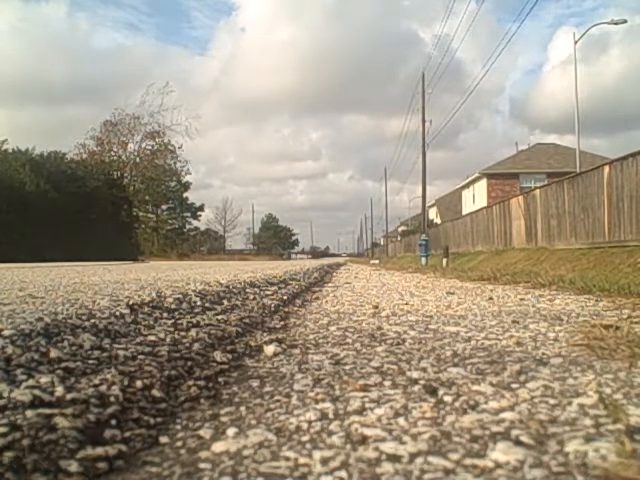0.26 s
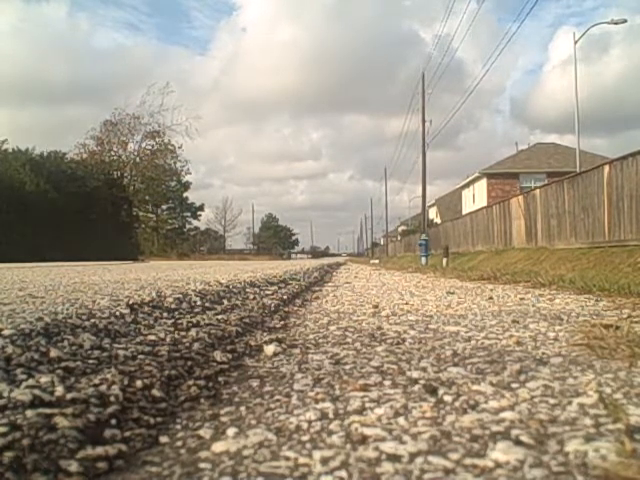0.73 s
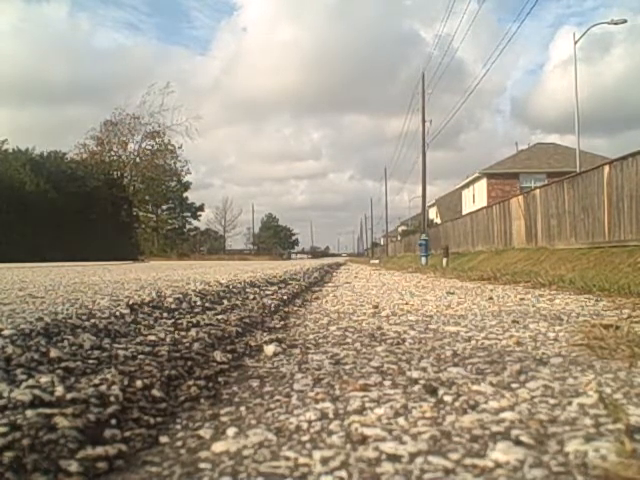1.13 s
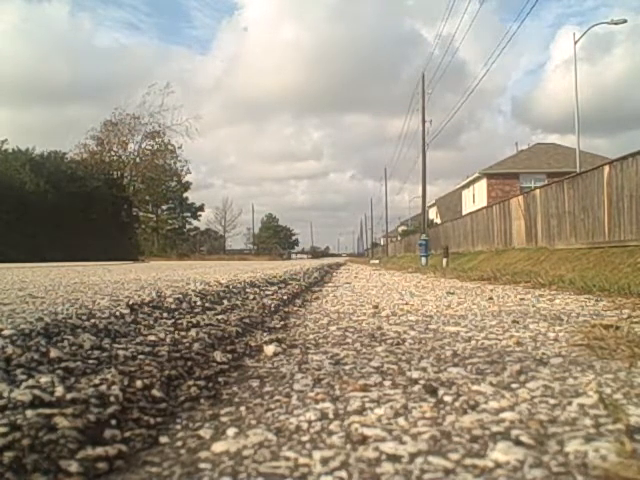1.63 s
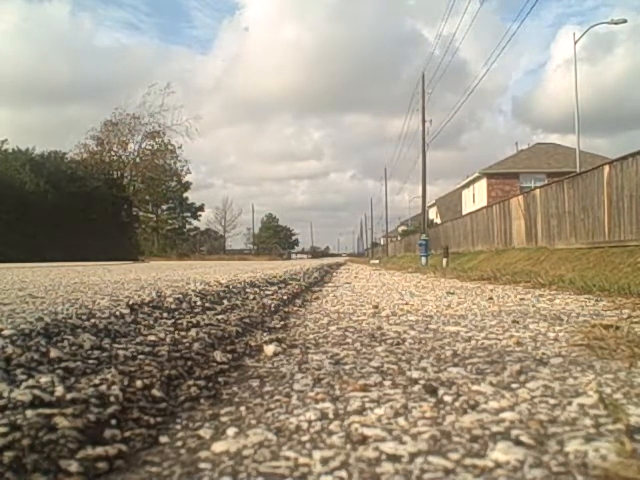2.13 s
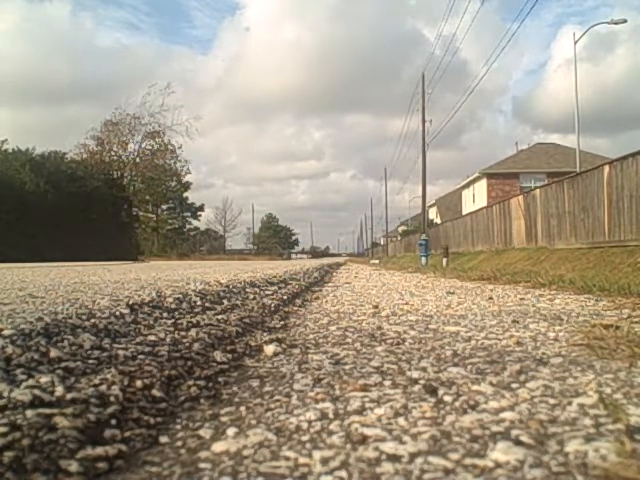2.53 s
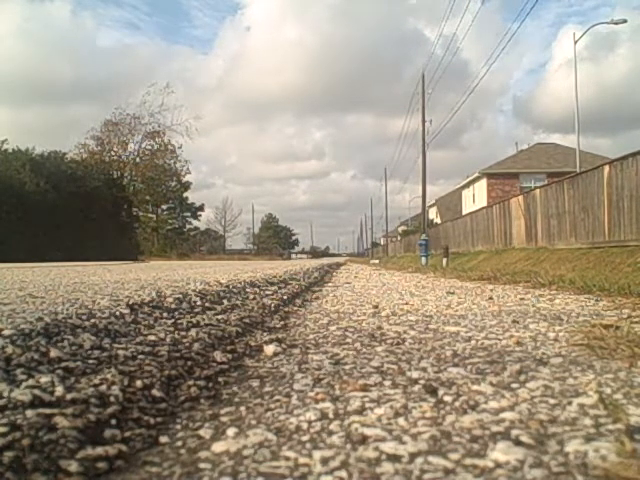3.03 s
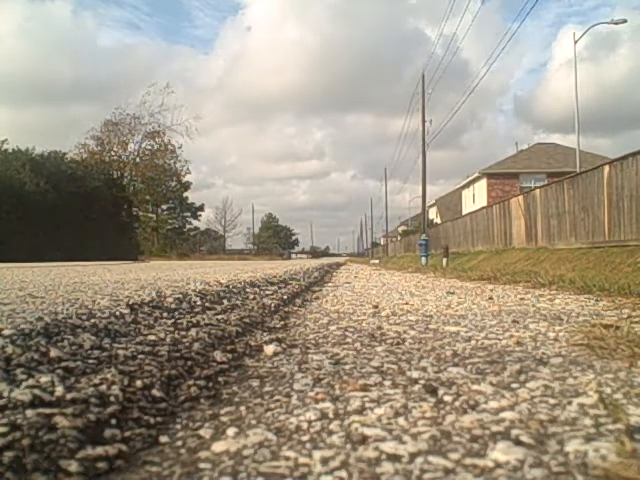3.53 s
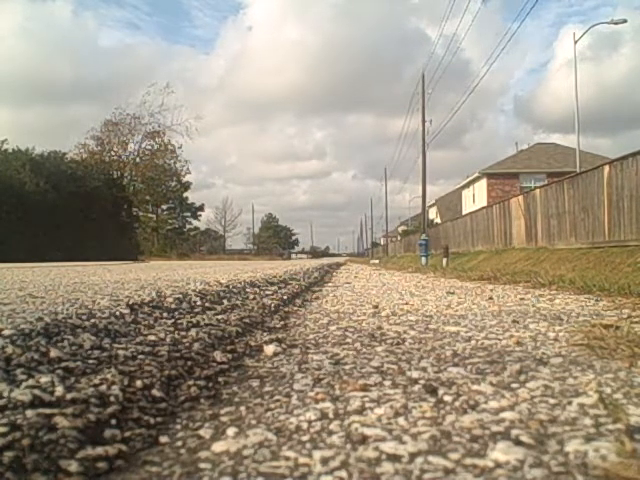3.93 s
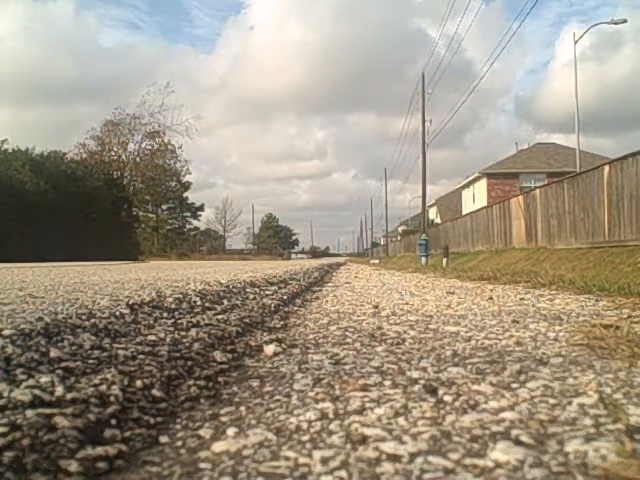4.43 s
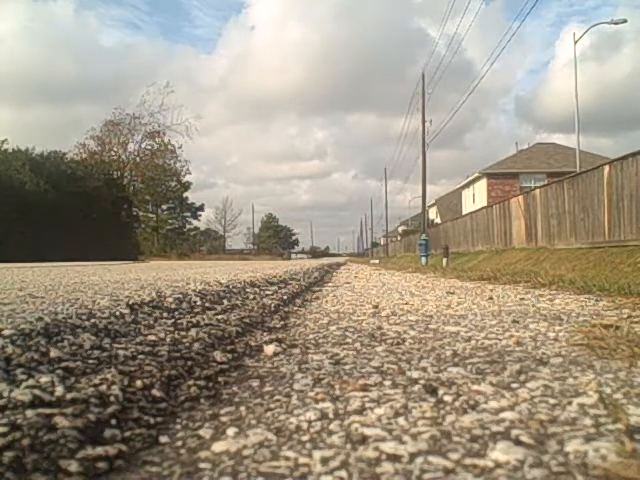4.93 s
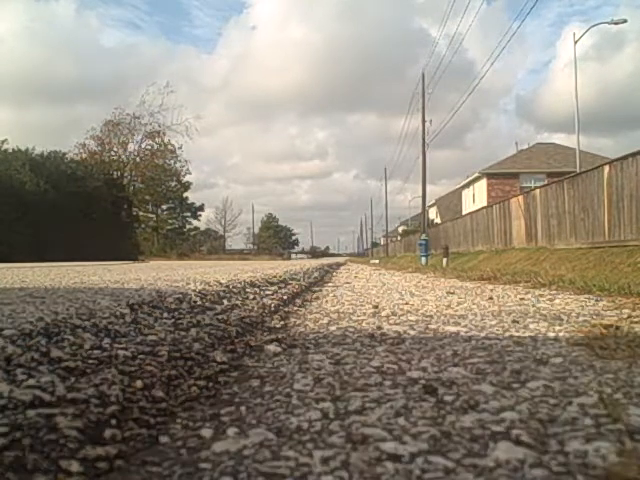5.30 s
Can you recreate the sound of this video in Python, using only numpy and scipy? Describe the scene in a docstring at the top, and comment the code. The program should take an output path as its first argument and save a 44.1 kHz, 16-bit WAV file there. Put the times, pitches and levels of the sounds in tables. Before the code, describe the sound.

A car slows along a quiet street, its boomy exhaust sinking to a burbling idle as tyres crackle up close over loose stones.

```python
"""A boomy exhaust note throbs against its own echo as a four-cylinder car slows down a quiet street.
The note sinks, lifts for a downshift and sinks again to a burbling idle, each firing ringing the silencer.
The tyres roar on the coarse road and, rolling up close, crackle over sand and loose stones.
As the car nears, its cooling fan hums and its turning parts whir.
Behind it all lies a low outdoor rumble, with faint microphone hiss and a thin high whine."""
import sys
import numpy as np
from scipy import signal
from scipy.fft import rfft, irfft, next_fast_len
from scipy.io import wavfile
from scipy.ndimage import uniform_filter1d, map_coordinates

SR = 44100
rng = np.random.default_rng(int(sys.argv[2]) if len(sys.argv) > 2 else 0)


def generate_wav(signal):
    """Clip the signal to [-1, 1] and save it as 16-bit WAV at the path in sys.argv[1]."""
    frames = np.transpose(np.atleast_2d(signal))
    scaled = np.clip(frames, -1, 1) * 32767
    pcm = np.round(scaled).astype(np.int16)
    wavfile.write(sys.argv[1], SR, pcm)


N = 245195
TIME = np.arange(N) / SR

# low outdoor rumble, faint microphone hiss and a thin high whine: (frequency [Hz], relative level [dB])
BACKGROUND_COLOUR = [(15, 7.5), (45, 10.5), (90, 10), (300, -4), (2000, -31), (5000, -50.5), (10000, -50),
                     (12500, -54), (14900, -30), (15280, -26), (15600, -36)]
# tone colours of the four tyre noises and a snapping stone: (frequency [Hz], relative level [dB])
ROAR_COLOUR = [(400, -8.5), (700, -8.5), (980, 3), (1300, 1.5), (1750, 0), (2100, -2), (2500, -9.5),
               (3200, -22), (4500, -26), (8000, -80)]
RUMBLE_COLOUR = [(15, -22), (45, 9), (90, -0.5), (160, 8), (270, 5), (360, 5), (470, 2.5), (590, -0.5),
                 (730, 3.5), (1000, -8), (2000, -43.5)]
HISS_COLOUR = [(1000, -18), (2800, 12.5), (3400, 5.5), (4300, 2.5), (5200, 2.5), (6200, -0.5), (7400, -3),
               (7900, -3), (8700, -4), (10200, -3.5), (12000, -6.5), (15500, -9)]
SAND_COLOUR = [(1000, -36), (2600, -4), (4200, 3), (5200, -2.5), (6300, 0), (7500, -0.5), (8800, -1.5),
               (9900, 0), (12000, -3), (15500, -3)]
SNAP_COLOUR = [(1500, -19), (3800, 3), (5600, 3.5), (7300, 4), (10000, 7.5), (12000, -2), (15500, -8.5)]
# how loud the tyres are: (time [s], roar level [dB], rumble level [dB], hiss level [dB])
TYRE_LEVELS = [(0, -46, -54.5, -71.5), (2.1, -45.5, -50.5, -66.5), (2.75, -42.5, -46, -59),
               (3.5, -42.5, -43.5, -59.5), (4.7, -45, -41.5, -63), (5.15, -46, -42.5, -56),
               (5.56, -44, -41, -53.5)]
# loose stones snapping under the tyres: (time [s], relative level [dB], ring pitch [Hz])
STONE_SNAPS = [(4.598, -45, 14530), (4.7277, -37, 12000), (4.832, -31.5, 9650), (4.9416, -31, 10000),
               (4.9744, -33, 6920), (5.0604, -24, 4160), (5.129, -31, 4500), (5.192, -24, 5513),
               (5.334, -24.5, 4500), (5.4117, -36, 5956), (5.5207, -24, 7640)]
# ringing of engine bay, wheels and brakes, each heard from its own angle:
# (pitch [Hz], filter width [Hz], top level [dB], loudest at [s], fade time [s])
PART_WHIRS = [(435, 79, -41, 4.9, 0.14), (700, 130, -48.5, 4.53, 0.5), (830, 280, -43, 4.95, 0.29),
              (1344, 530, -47.5, 4.676, 0.56), (1740, 98, -52.5, 3.33, 0.86), (2047, 65, -52.5, 4.42, 0.38),
              (5230, 2100, -59, 4.766, 0.64)]
# how often the engine fires, as heard: (time [s], firing rate [Hz])
FIRING_RATE = [(0, 119.5), (.39, 114.4), (1.11, 101), (1.63, 89.25), (2.01, 83.5), (2.26, 82.5),
               (2.48, 99.7), (2.59, 106.1), (2.8, 102.7), (2.91, 98.6), (3.33, 83.43), (3.84, 66.1),
               (4.33, 48.8), (4.65, 36.83), (4.96, 36.21), (5.22, 27.82), (5.56, 25.92)]
# the loudest hollow throbs of the silencer near idle: (time [s], pitch [Hz], top level [dB])
SILENCER_BOOMS = [(4.435, 182, -33.5), (4.61, 179.2, -30), (4.843, 157.8, -27), (4.964, 158.5, -33),
                  (5.028, 168, -29.5), (5.159, 163.8, -34.5), (5.236, 164.2, -30.5)]
# pitches at which the silencer rings: (pitch [Hz], base filter width [Hz], relative level [dB])
SILENCER_RINGS = [(91.3, 13.6, 3), (120.3, 19.7, 3.5), (173.4, 37, 1.5), (226.8, 20.4, -3),
                  (348.5, 59, -16), (443, 36, -19)]
# how loudly the silencer rings: (time [s], base level [dB])
BURBLE_LEVEL = [(0, -51), (2, -57.5), (2.9, -52), (3.7, -53), (4.1, -35.5), (4.9, -32.5), (5.56, -35)]
# how the pipe lifts or weakens a tone sliding through its resonances: (pitch [Hz], gain [dB])
PIPE_RESPONSE = [(25, -23), (36, -11.5), (48, -11), (58, -4), (72, 4), (86, 0.5), (100, -0.5), (112, 5.5),
                 (122, 3.5), (147, -3), (176, 5), (196, -3), (207, -8.5), (245, 0.5)]
# strength of the smooth exhaust note: (time [s], base level [dB])
NOTE_LEVEL = [(0, -39.5), (.55, -37.5), (.88, -42), (1.2, -37.5), (2.1, -35.5), (2.65, -30.5), (3.7, -29),
              (4.17, -22), (4.36, -27), (5.56, -34)]
# weaker engine tones: (pitch [times the firing rate], relative level [dB])
WEAK_TONES = [(1.5, -30), (2.5, -29), (3, -22), (4, -29), (4.5, -24)]
# the echo beats against the note, more slowly as the car slows: (time [s], beat rate [Hz])
ECHO_BEATS = [(.408, 9.06), (1.09, 5.22)]

CLUTCH_OPEN_S, CLUTCH_SHUT_S, CLUTCH_RAMP_S = 2.12, 2.605, 0.049  # the downshift


def undb(db):
    """Turn decibels into a gain to multiply by."""
    return 10 ** (np.asarray(db) / 20)


def curves(table):
    """The columns of a table, joined by straight lines in time."""
    times, *columns = np.transpose(table)
    return [np.interp(TIME, times, column) for column in columns]


def ramp(middle_s, length_s):
    """A straight rise from 0 to 1 around a moment."""
    return np.clip((TIME - middle_s) / length_s + .5, 0, 1)


def swell(peak_s, fade_s):
    """A smooth rise to 1 and fall back around a moment."""
    return np.exp(-((TIME - peak_s) / fade_s) ** 2)


def unit(x):
    """Scale a signal to a typical size (rms) of 1."""
    return x / np.std(x)


def wander(rate_hz):
    """A smooth random drift of typical size 1, with about rate_hz new values a second."""
    hold = int(SR / rate_hz)
    steps = np.repeat(rng.standard_normal(N // hold + 1), hold)
    return unit(uniform_filter1d(uniform_filter1d(steps, hold), hold)[:N])


def colour(x, points, band_hz=None):
    """Give a sound a tone colour; its typical size is 1 overall, or inside the band."""
    size = next_fast_len(N, real=True)
    bins_hz = np.maximum(np.fft.rfftfreq(size, 1 / SR), 1)
    hz, db = np.transpose(points)
    shaped = rfft(x, size) * undb(np.interp(np.log(bins_hz), np.log(hz), db))
    inside = shaped if band_hz is None else shaped[(bins_hz > band_hz[0]) & (bins_hz < band_hz[1])]
    return irfft(shaped, size)[:N] * size / np.sqrt(2 * np.sum(np.abs(inside) ** 2))


def resonate(x, hz, width_hz, passes=1):
    """Make a sound ring at one pitch; each extra pass narrows the ring."""
    for _ in range(passes):
        x = signal.lfilter(*signal.iirpeak(hz, hz / width_hz, SR), x)
    return x


def background(level_db=-52):
    """Low outdoor rumble, with faint microphone hiss and a thin high whine."""
    return undb(level_db + wander(6.1)) * colour(rng.standard_normal(N), BACKGROUND_COLOUR)


def remoteness(arrives_s=5.68, arrival_m_s=3, braking_m_s2=2.5, side_m=1.6):
    """How far off the braking car is: 0 when alongside, 1 more for each tenfold distance."""
    left_s = arrives_s - TIME
    along_m = arrival_m_s * left_s + .5 * braking_m_s2 * left_s ** 2
    return np.log10(np.hypot(along_m, side_m) / side_m)


def fan_and_whirs(far, fan_hz=47.7, alongside_db=-33.5, tenfold_loss_db=29):
    """The cooling fan hums, and each turning part whirs loudest when it faces the listener."""
    fan_turns = np.cumsum(fan_hz * (1 + 0.0076 * wander(5.3))) / SR
    out = undb(alongside_db - tenfold_loss_db * far) * np.sqrt(2) * np.sin(2 * np.pi * fan_turns)
    for hz, width_hz, db, peak_s, fade_s in PART_WHIRS:
        whir = unit(resonate(rng.standard_normal(N), hz, width_hz, passes=2))
        out += undb(db) * swell(peak_s, fade_s) * whir
    return out


def fence(direct, strength=0.17, far_lag_s=.004, near_lag_s=.016):
    """A roadside fence reflects the tyre noise; the detour grows as the car comes closer."""
    lag_s = far_lag_s * (near_lag_s / far_lag_s) ** (TIME / TIME[-1])
    reflected = map_coordinates(direct, [(TIME - lag_s) * SR], order=3)
    return (direct + strength * reflected) / np.sqrt(1 + strength ** 2)


def grit(cracks_per_s=2500, spread_db=3):
    """Countless tiny cracks of sand under the tread, a few much bigger than the rest."""
    sizes = undb(spread_db * np.minimum(rng.exponential(size=N), 4))
    cracks = rng.random(N) < cracks_per_s / SR
    return unit(cracks * sizes * rng.standard_normal(N))


def crumble(breaks_per_s=55, crush_s=0.0038):
    """Loudness of the crunch: small pebbles give way at random, each a spurt that dies away."""
    breaks = (rng.random(N) < breaks_per_s / SR) * rng.uniform(0.47, 1, N)
    gain = 1 + signal.lfilter([1], [1, -np.exp(-1 / (crush_s * SR))], breaks)
    return gain / np.sqrt(np.mean(gain ** 2))


def tyres(far, grit_share=0.1, sand_alongside_db=-43.5, tenfold_loss_db=30):
    """The tread roars and hisses, the tyre body rumbles, and sand crunches when the car is near."""
    roar_db, rumble_db, hiss_db = curves(TYRE_LEVELS)
    roar = colour(rng.standard_normal(N), ROAR_COLOUR, band_hz=(900, 2200))
    rumble = colour(rng.standard_normal(N), RUMBLE_COLOUR, band_hz=(280, 700))
    hiss = colour(rng.standard_normal(N), HISS_COLOUR, band_hz=(4500, 15000))
    contact = np.sqrt(1 - grit_share) * rng.standard_normal(N) + np.sqrt(grit_share) * grit()
    sand = colour(contact, SAND_COLOUR, band_hz=(4500, 15000))
    return (roar * undb(roar_db + 0.22 * wander(14))
            + rumble * undb(rumble_db + 0.19 * wander(9))
            + hiss * undb(hiss_db + 0.27 * wander(31.6))
            + sand * undb(sand_alongside_db - tenfold_loss_db * far) * crumble())


def stones(crush_s=0.0077, rise_s=0.0022, gain_db=-10, colour_spread_db=2, ring_db=6):
    """A pinched stone gives way in a short spray of cracks, each stone with its own colour and ring."""
    out = np.zeros(N)
    for snap_s, db, ring_hz in STONE_SNAPS:
        age_s = np.maximum(TIME - snap_s + rise_s, 0)
        burst = (1 - np.exp(-age_s / rise_s)) * np.exp(-age_s / crush_s)
        own_colour = [(hz, level + colour_spread_db * rng.standard_normal()) for hz, level in SNAP_COLOUR]
        spray = colour(rng.standard_normal(N), own_colour)
        ring = undb(ring_db) * resonate(spray, ring_hz, width_hz=0.29 * ring_hz)
        out += undb(db + gain_db) * burst * unit(spray + ring)
    return out


def stumble():
    """The engine's brief jolt as the clutch opens, from 0 to 1 and back."""
    return swell(CLUTCH_OPEN_S, fade_s=.03)


def unevenness(firing_hz, clutch_open, idle_below_hz=44, idle_onset_hz=4):
    """The engine fires unevenly when it stumbles, runs free or sinks towards idle."""
    idle = 1 / (1 + np.exp((firing_hz - idle_below_hz) / idle_onset_hz))
    return stumble() + 0.24 * clutch_open + 0.26 * idle


def booms(fade_s=.028):
    """The silencer's main ring swells and sinks in short throbs."""
    return sum(undb(db) * swell(peak_s, fade_s) * np.sqrt(2) * np.sin(2 * np.pi * hz * TIME)
               for peak_s, hz, db in SILENCER_BOOMS)


def burble(firings, firing_hz, uneven, scatter_db=6, puff_cycles=0.19, stumble_db=8):
    """Each firing kicks the silencer into ringing and sends a puff of rushing gas after it."""
    fired = np.flatnonzero(np.diff(np.floor(firings))) + 1
    kicks = np.zeros(N)
    kicks[fired] = undb(scatter_db * uneven[fired] * rng.standard_normal(len(fired)))
    kicks *= np.sqrt(firing_hz.min() / firing_hz)  # faster kicks are each softer
    puffs = 0.065 * np.exp(-(firings % 1) / puff_cycles) * rng.standard_normal(N)
    rings = sum(undb(db) * resonate(kicks + puffs, hz, 1.07 * width_hz, passes=2)
                for hz, width_hz, db in SILENCER_RINGS)
    return unit(rings) * undb(curves(BURBLE_LEVEL)[0] + stumble_db * stumble())


def pipe_db(hz):
    """How much the exhaust pipe lifts or weakens a tone at this pitch."""
    points_hz, db = np.transpose(PIPE_RESPONSE)
    return np.interp(np.log(hz), np.log(points_hz), db)


def wall_throb(angle, first_dip_s=.099):
    """A tone beats against its echo, which is lower because the car drives away from the echoing wall."""
    echo_gain = .8 * (1 - ramp(middle_s=1.46, length_s=.16))
    beats = np.cumsum(curves(ECHO_BEATS)[0]) / SR
    # the echo falls one cycle further behind on every beat
    slip = 2 * np.pi * (beats - np.interp(first_dip_s, TIME, beats) + .5)
    return (np.cos(angle) + echo_gain * np.cos(angle - slip)) / np.sqrt(1 + echo_gain ** 2)


def exhaust_note(firings, firing_hz, uneven, clutch_open, clutch_dip_db=-7.5, octave_db=-9.5):
    """The firings blend into a smooth note with higher tones, quieter while the clutch is open."""
    level_db = curves(NOTE_LEVEL)[0] + clutch_dip_db * clutch_open
    angle = 2 * np.pi * firings
    waver_db = (.5 + 2 * clutch_open) * wander(25.1)
    note = undb(level_db + pipe_db(firing_hz) + waver_db) * wall_throb(angle)
    octave = undb(level_db + octave_db + pipe_db(2 * firing_hz) + 2.5 * wander(18)) * np.cos(2 * angle)
    weak_tones = sum(undb(level_db + db + 0.5 + 3 * wander(5.23)) * np.cos(multiple * angle)
                     for multiple, db in WEAK_TONES)
    # alternate cylinders push unequally, which adds tones halfway between the others
    limp = 1 + uneven * np.cos(angle / 2)
    return np.sqrt(2) * (note - octave + weak_tones) * limp


def scene():
    """Exhaust, turning parts and tyres of one car over a faint background, in one channel."""
    firing_hz, = curves(FIRING_RATE)
    clutch_open = ramp(CLUTCH_OPEN_S, CLUTCH_RAMP_S) - ramp(CLUTCH_SHUT_S, CLUTCH_RAMP_S)
    uneven = unevenness(firing_hz, clutch_open)
    far = remoteness()
    firings = np.cumsum(firing_hz * (1 + .002 * wander(20))) / SR  # running count
    note = exhaust_note(firings, firing_hz, uneven, clutch_open)
    silencer = burble(firings, firing_hz, uneven) + booms()
    return (note + silencer + fan_and_whirs(far) + fence(tyres(far)) + stones() + background())[None]


def record(dry, top_hz=15650):
    """Cut away the very highest treble."""
    return signal.sosfilt(signal.ellip(10, .1, 80, top_hz, fs=SR, output="sos"), dry)


dry = scene()
out = record(dry)
generate_wav(out)
```